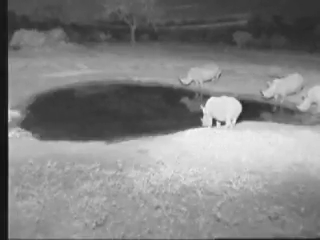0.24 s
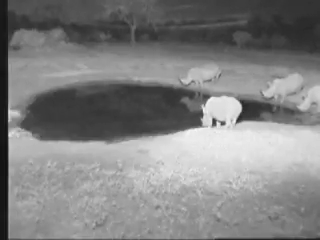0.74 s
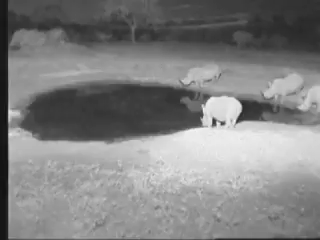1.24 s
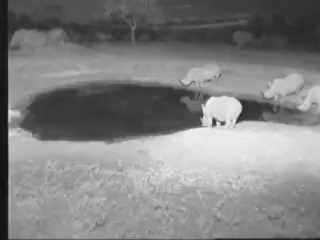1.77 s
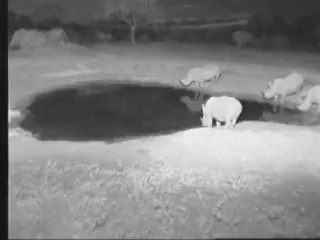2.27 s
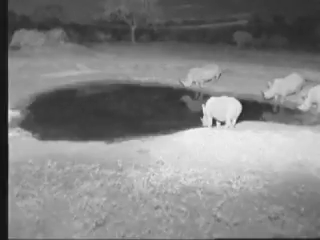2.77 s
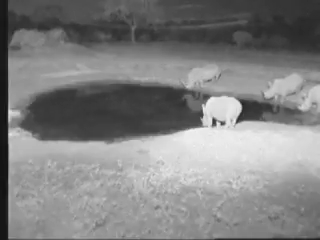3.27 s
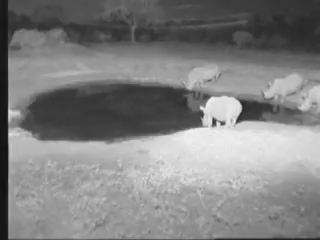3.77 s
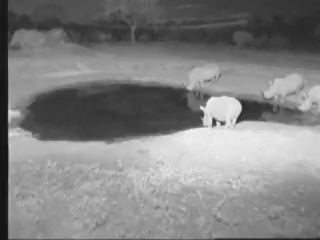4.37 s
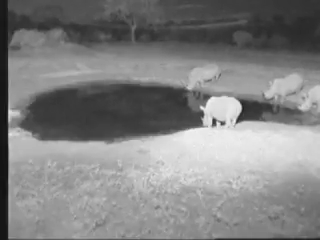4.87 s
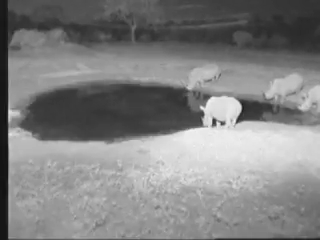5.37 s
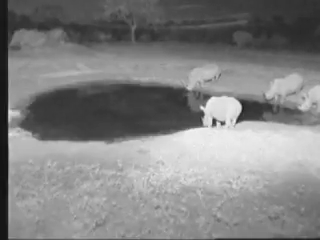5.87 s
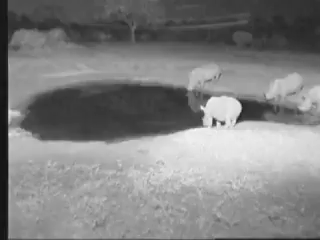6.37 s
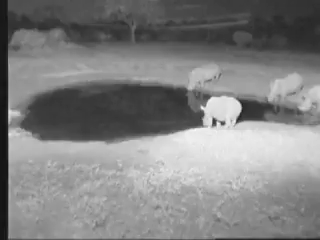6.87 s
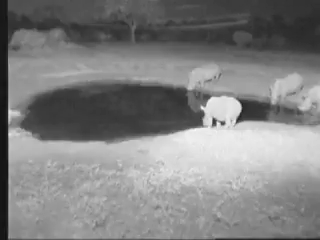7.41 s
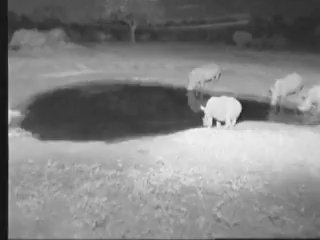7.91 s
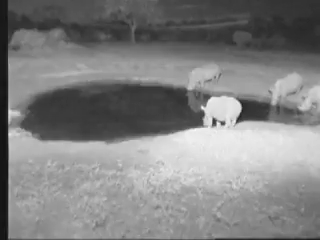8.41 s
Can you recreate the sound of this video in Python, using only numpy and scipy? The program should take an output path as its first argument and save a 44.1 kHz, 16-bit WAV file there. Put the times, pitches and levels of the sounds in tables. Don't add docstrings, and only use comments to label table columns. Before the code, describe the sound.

A rhino laps at a night waterhole with ringing drips, draws a hissing breath and blows one loud fluttering snort over steady electrical hum.

```python
import sys
import numpy as np
from scipy import signal
from scipy.fft import rfft, irfft, next_fast_len
from scipy.io import wavfile
from scipy.ndimage import uniform_filter1d, map_coordinates

SR = 44100
rng = np.random.default_rng(int(sys.argv[2]) if len(sys.argv) > 2 else 0)


def level_to_linear(level):
    exponent = np.asarray(level, float) / 20
    return 10 ** exponent


def store_wav(level_fs):
    pcm = np.round(np.clip(np.atleast_2d(level_fs), -1, 1) * 32767)
    wavfile.write(sys.argv[1], SR, pcm.T.astype(np.int16))


N = 381465
T = np.arange(N) / SR


def unit(x):
    return x / np.sqrt(np.mean(x ** 2) + 1e-20)


def curves(rows):
    time_s, *columns = np.transpose(rows)
    return [np.interp(T, time_s, column, left=-120, right=-120) for column in columns]


def wobble(rate_hz):
    knots = rng.standard_normal(int(N * rate_hz / SR) + 4)
    return map_coordinates(knots, [T * rate_hz])


def bump(start_s, length_s):
    return np.cos(np.pi * np.clip((T - start_s) / length_s, -.5, .5)) ** 2


def filtered(x, response):
    size = next_fast_len(N + SR // 2)
    return irfft(rfft(x, size) * response(np.fft.rfftfreq(size, 1 / SR)), size)[..., :N]


def colour(points):
    hz, db = np.transpose(points)
    return lambda f: level_to_linear(np.interp(np.log(f + 1), np.log(hz), db, left=-120, right=-120))


def modes(rows):
    def response(f):
        total = 0
        for k, (hz, width_hz, db) in enumerate(rows):
            damping = 1j * f * width_hz
            total = total + (-1) ** k * level_to_linear(db) * damping / (hz * hz - f * f + damping)
        return total
    return response


def rush(response, grain_db, patchy_db, count=6):
    grainy = rng.standard_normal(N) * level_to_linear(grain_db * wobble(300))
    z = signal.stft(grainy, nperseg=512)[2]
    patches = uniform_filter1d(rng.standard_normal(z.shape), size=4, axis=0)
    patches = uniform_filter1d(patches, size=count, axis=1)
    noise = signal.istft(z * level_to_linear(patchy_db * unit(patches)), nperseg=512)[1][:N]
    return unit(filtered(noise, response))


def hum():
    # (time [s], frequency [Hz])
    mains_hz = [(0, 49.878), (4, 49.870), (8.65, 49.852)]
    # (start [cycles], length [cycles], sign [+-1], level [dB])
    lobes = [
        (.0, .088, 1, -27),
        (.086, .15, -1, -21.5),
        (.22, .3, 1, -33),
    ]
    # (time [s], level [dB])
    load = [(0, -66), (1.3, -57), (2.1, -52.5), (4.2, -43.5), (5.4, -41.5), (7.7, -51), (8.65, -60)]
    cycle = np.cumsum(curves(mains_hz)[0]) / SR - .027
    wave = np.zeros(N)
    for start, length, sign, db in lobes:
        def lobe(phase):
            return np.sin(np.pi * np.clip(phase / length, 0, 1) ** .7) ** 1.2
        u = (cycle - start) % 1
        wave += sign * level_to_linear(db) * (lobe(u) - lobe((u - .5) % 1))
    load_db, = curves(load)
    for order, db in (7, -53), (9, -32 + .35 * load_db), (11, load_db):
        wave += level_to_linear(db + 3) * np.cos(2 * np.pi * order * (cycle - .065))
    return wave * level_to_linear(-0.85 + 0.36 * wobble(3))


def buzz():
    # (place [cycles], sign [+-1], level [dB])
    sync = [(.156, -1, -35), (.177, 1, -36), (.654, -1, -35), (.676, 1, -35), (.748, 1, -21),
            (.758, 1, -24), (.767, -1, -33), (.825, -1, -30)]
    field = T * 50 % 1
    sway = level_to_linear(-39) * np.sin(2 * np.pi * (field - .04))
    sway = sway + level_to_linear(-44) * np.sin(4 * np.pi * (field + .03))
    edges = sum(sign * level_to_linear(db) * np.exp(-((field - at) / 0.0031) ** 2) for at, sign, db in sync)
    whine = np.sin(2 * np.pi * 7084.7 * T) * (1 + .8 * np.cos(2 * np.pi * field))
    return sway + edges * level_to_linear(-1.2 + 1.2 * wobble(40)) + level_to_linear(-51.5 + 4.8 * wobble(5.5)) * whine


def noise_floor():
    # (frequency [Hz], density [dB per Hz])
    hiss_points = [(350, -16), (600, -3.5), (846, -2), (955, -7.5), (1700, -5.5), (2230, -6.5), (3250, -6),
                   (4100, -7), (6730, -5), (8750, -29.5), (14800, -120)]
    # (frequency [Hz], density [dB per Hz])
    murk_points = [(20, -4.5), (40, 4.5), (90, -10.5), (200, -9), (450, -13), (700, -17.5), (1100, -20.5),
                   (1500, -66)]
    hiss = rush(colour(hiss_points), grain_db=1.5, patchy_db=1.2)
    murk = rush(colour(murk_points), grain_db=-0.4, patchy_db=0.5)
    return level_to_linear(-38.5) * hiss + level_to_linear(-37) * murk


def grit(depth_db):
    # (frequency [Hz], density [dB per Hz])
    grit_points = [(7400, -40), (7700, 0), (11000, 0), (12400, 2), (12800, 1), (12900, -60)]
    z = signal.stft(rng.standard_normal(N), nperseg=8192)[2]
    lines = unit(uniform_filter1d(rng.standard_normal(z.shape), size=2, axis=1))
    noise = signal.istft(z * level_to_linear(depth_db * np.minimum(lines, 2)), nperseg=8192)[1][:N]
    return unit(filtered(noise, colour(grit_points)))


def laps():
    # (time [s], peak level [dB], length [s])
    flicks = [(0.0, -9, 0.026), (0.047, -9.5, 0.048), (0.321, -15, 0.03), (0.682, -15, 0.032),
              (0.7178, -18, 0.039), (0.755, -19, 0.06), (0.7861, -17.5, 0.049), (1.4097, -27, 0.035),
              (1.52, -24, 0.023), (2.601, -16.5, 0.035), (2.88, -18, 0.045), (3.835, -23, 0.043),
              (5.089, -20, 0.035), (5.167, -20.5, 0.028), (5.207, -34.5, 0.031)]
    # (time [s], peak level [dB], length [s])
    full_laps = [(0.022, -10, 0.025), (0.124, -14, 0.049), (0.1544, -17, 0.027), (0.492, -25.5, 0.043),
                 (0.6584, -8.5, 0.039), (1.3844, -18.5, 0.048), (1.9604, -14, 0.046), (1.9785, -8.5, 0.032),
                 (2.042, -10.5, 0.05), (2.548, -13.5, 0.051), (2.639, -18, 0.023), (3.1, -19, 0.05),
                 (3.16, -20, 0.044), (3.928, -20, 0.035)]
    # (time [s], peak level [dB], length [s])
    gulps = [(0.8707, -16.5, 0.043), (0.917, -25, 0.079), (1.545, -25, 0.068), (1.853, -17, 0.066),
             (1.888, -18.5, 0.071), (2.092, -24, 0.035), (2.4516, -16, 0.075), (2.481, -20, 0.059),
             (4.2155, -17, 0.03)]
    # (time [s], peak level [dB], length [s])
    sips = [(1.054, -26.5, 0.075), (1.2744, -19.5, 0.035), (1.309, -24, 0.04)]
    # (frequency [Hz], width [Hz], level [dB])
    water = [
        [(833, 420, 2), (1670, 530, 3)],
        [(2587, 530, 7), (3565, 620, 0)],
        [(5000, 620, 16.5), (6580, 640, -9.5)],
    ]
    # (rows, low share dB, high share dB)
    strokes = [(flicks, -6, -10.5), (full_laps, -7, -21), (gulps, 0, -22), (sips, -22, -18)]
    powers, t = np.zeros((3, N + SR)), np.arange(SR // 2) / SR
    for rows, low_db, high_db in strokes:
        shares = level_to_linear(np.array([low_db, 0, high_db]))
        for start_s, db, length_s in rows:
            decay = np.exp(-(t / length_s) ** 2) + .15 * np.exp(-t / 0.1)
            shape = level_to_linear(db - 9) * decay * (1 - np.exp(-t / 0.0071))
            powers[:, round(start_s * SR):][:, :len(t)] += np.outer(shares, shape) ** 2
    return sum(np.sqrt(power[:N]) * rush(modes(band), grain_db=2.5, patchy_db=2.8)
               for power, band in zip(powers, water))


def trickles():
    # (time [s], length [s], frequency [Hz], width [Hz], level [dB])
    runs = [(.02, 0.065, 4970, 500, -28), (0.138, 0.053, 5000, 600, -27), (0.323, 0.037, 6700, 600, -32),
            (0.659, 0.043, 5170, 500, -30.5), (1.532, 0.16, 2700, 400, -37), (1.96, 0.065, 6800, 400, -38),
            (1.963, 0.081, 5240, 500, -34.5), (2.284, 0.084, 2670, 400, -35), (2.58, .06, 4700, 400, -37),
            (2.675, 0.08, 1950, 120, -37), (5.799, 0.22, 1300, 700, -43.5), (7.754, .1, 1860, 400, -37),
            (7.72, .08, 5300, 120, -42), (7.93, .08, 5400, 100, -40), (8.062, 0.1, 2700, 500, -42.5),
            (8.297, 0.24, 2650, 90, -42)]
    out = np.zeros(N)
    for start_s, length_s, hz, width_hz, db in runs:
        u = np.arange(round(length_s * SR)) / (length_s * SR)
        band = signal.iirpeak(hz, hz / width_hz, SR)
        noise = unit(signal.lfilter(*band, rng.standard_normal(SR // 4)))
        out[round(start_s * SR):][:len(u)] += level_to_linear(db) * np.sqrt(np.sin(np.pi * u ** 0.51)) * noise[:len(u)]
    return out


def drops():
    # (time [s], peak level [dB], pitch [Hz], rise [share])
    plinks = [(0.029, -4, 3140, 0.32), (.049, -16, 2600, 0.23), (.1315, -11, 3020, 0.25),
              (.685, -11, 2510, 0.61), (1.2365, -12, 6500, -0.089), (1.682, -2.5, 2650, 0.15),
              (1.682, -18, 5000, 0.01), (1.689, -13, 2710, -0.22), (1.996, -9, 2900, .2),
              (4.878, -8, 5000, 0.01), (5.0235, -4.5, 3100, 0.01), (2.669, -21, 2100, -.1),
              (3.94, -22, 1600, .05)]
    # (time [s], peak level [dB], pitch [Hz], ring T60 [s])
    splashes = [(3.087, -12, 2400, .02), (3.092, -5.5, 2950, 0.024), (3.095, -10.5, 2200, 0.019),
                (3.092, -14, 1380, 0.018), (3.098, -10.5, 820, 0.022), (3.094, -16, 1140, .02),
                (3.339, -17, 1244, .08), (5.4075, -20, 3800, .004), (5.4075, -22, 1100, .008),
                (5.4268, 9, 3020, .015), (5.436, -9, 3000, .06), (5.4244, -15, 2410, .02),
                (5.427, -3, 3600, 0.015), (5.427, -6, 4600, .006), (5.427, -9, 6000, .005),
                (5.427, -10, 800, 0.027), (5.442, -11, 1400, 0.036), (5.427, 3, 2000, 0.013),
                (5.4339, 4.5, 1330, 0.01), (6.502, -22, 1010, 0.037), (6.5105, -11, 1300, 0.035),
                (6.512, -5, 1046, 0.023), (6.51, -19.5, 2620, .04), (6.512, -25, 3400, .02),
                (7.553, -12, 1200, 0.015), (7.558, -21.5, 2690, 0.06), (7.560, -17.5, 3450, 0.037),
                (7.5625, -7, 5450, 0.018), (7.567, -19, 5200, .035), (7.564, -22, 6800, .02)]
    # (time [s], peak level [dB], pitch [Hz], rise [share], ring T60 [s])
    gurgle = (2.547, -21.5, 1400, 1.55, 0.72)
    plink_t60_s, splash_rise = .015, .04
    bubbles = [row + (plink_t60_s,) for row in plinks]
    bubbles += [(start_s, db, hz, splash_rise, t60_s) for start_s, db, hz, t60_s in splashes]
    bubbles += [gurgle]
    spray_full_scale_db, spray_growth, spray_db_per_octave = -21, .75, 1.5
    out, t = np.zeros(N + SR), np.arange(SR // 4) / SR
    echo = level_to_linear(-60 * t / 0.15) + level_to_linear(-17.5) * np.exp(-((t - .042) / 0.013) ** 2)
    for start_s, db, hz, rise, t60_s in bubbles:
        pitch_hz = hz * (1 + rise * np.clip(t / 0.032, 0, 1) ** 3)
        ring_db = -60 * t / t60_s + 2.1 * rise * np.sin(2 * np.pi * t / 0.035 + 1.4)
        ring = np.sin(2 * np.pi * np.cumsum(pitch_hz) / SR) * level_to_linear(ring_db)
        ring *= t < .038 + (rise < 1)
        band = signal.iirpeak(hz * (1 + rise / 2), 3.5, SR)
        white = rng.standard_normal(len(t))
        scatter = signal.lfilter(*band, signal.lfilter(*band, white)) + 0.08 * white
        spray_db = spray_full_scale_db + (spray_growth - 1) * db + spray_db_per_octave * np.log2(hz / 2500)
        spray = level_to_linear(spray_db) * echo * unit(scatter)
        attack = 1 - np.exp(-t * hz / 1.3)
        out[round(start_s * SR) - 40:][:len(t)] += level_to_linear(db + 2) * attack * (ring + spray)
    return out[:N]


def supply():
    bursts = [(2, 2, 3), (11, 3, 2), (16, 2, 2), (22, 2, 2), (27, 2, 2), (32, 2, 4), (41, 2, 2), (46, 4, 2),
              (53, 3, 3), (61, 2, 2), (66, 2, 2), (72, 3, 2), (79, 2, 2), (86, 3, 2), (93, 7, 3),
              (104, 9, 2), (115, 3, 2), (122, 3, 3), (130, 2, 4), (139, 4, 3), (154, 3, 4), (168, 2, 3),
              (175, 10, 2), (188, 5, 2), (196, 2, 3), (204, 3, 2), (209, 2, 3)]
    # (time [s], length [s], level [dB])
    sag_rows = [(2.07, .08, -34), (4.413, 0.11, -30), (4.78, .08, -40), (5.978, .14, -28), (7.08, .12, -23),
                (8.588, 0.058, -30)]
    frame_s, clock_start_s, thump_db, thump_s = .04, .028, -21.5, .04
    sent_s = [clock_start_s + frame_s * (first + apart * k)
              for first, apart, count in bursts for k in range(count)]
    jumps = sum(level_to_linear(thump_db + .8 * rng.normal()) * bump(start_s, thump_s) for start_s in sent_s)
    sags = sum(level_to_linear(db) * bump(start_s, length_s) for start_s, length_s, db in sag_rows)
    return jumps - sags + level_to_linear(-39) * wobble(10)


def inhale():
    # (time [s], level [dB])
    flow = [
        (2.8, -45),
        (2.918, -38),
        (3.056, -33),
        (3.294, -37),
        (3.46, -37.5),
        (3.836, -33.5),
        (4.22, -39.5),
    ]
    # (frequency [Hz], width [Hz], level [dB])
    nostril = [
        [(2900, 830, 8), (3850, 500, 4.5)],
        [(5740, 600, 7.5), (4470, 250, 3)],
    ]
    flow_db, = curves(flow)
    whistle_db = flow_db + -8 + 4.5 * (T - flow[0][0])
    return sum(level_to_linear(db + 1.5 + wobble(14)) * rush(modes(band), grain_db=1.5, patchy_db=1.8)
               for db, band in zip((flow_db, whistle_db), nostril))


def snort():
    # (time [s], effort [dB], nasal share [dB])
    blast = [
        (4.214, -55, -5),
        (4.219, -27, -6),
        (4.262, -19, -.5),
        (4.3, -11, -3),
        (4.41, -12.5, -.5),
        (4.548, -6.3, -1.5),
        (4.8, -15.5, -2),
        (5.03, -25, -6.5),
        (5.3, -55, 5),
    ]
    # (frequency [Hz], density [dB per Hz])
    blow_points = [(88, -47.5), (150, -19.5), (173, -41.5), (250, -5), (275, -29), (343, 1), (464, -2.5),
                   (511, 3.5), (773, 1.5), (906, -4.5), (1850, -13), (2590, -9.5), (4180, -7.5),
                   (6020, -5.5), (6730, -10), (8750, -24.5), (14800, -120)]
    chest_hz, chest_db, chest_lag_s = 430, -7.5, .1
    spray_swing = 1.05
    blow = colour(blow_points)

    def over(f, hz):
        return 1 / (1 + (hz / (f + 1)) ** 6)

    parts = [lambda f: blow(f) * (1 - over(f, chest_hz)),
             lambda f: blow(f) * over(f, chest_hz) * (1 - over(f, 900)),
             lambda f: blow(f) * over(f, 996) * (1 - over(f, 3830)),
             lambda f: blow(f) * over(f, 3900) * (f < 7000)]
    effort_db, nasal_db = curves(blast)
    nose_db = effort_db + nasal_db
    late_db = np.interp(T - chest_lag_s, T, nose_db)
    levels_db = np.minimum(nose_db, late_db) + chest_db, nose_db - 1.2, effort_db, spray_swing * effort_db
    depths_db = 1.3, 1.3, .8, .7
    flutter = wobble(45)
    return sum(level_to_linear(db + 1.5 + depth_db * flutter) * rush(part, grain_db=1.8, patchy_db=1.5, count=14)
               for db, part, depth_db in zip(levels_db, parts, depths_db))


def scene():
    air = laps() + trickles() + drops() + inhale() + snort()
    line = noise_floor() + hum() + buzz() + supply()
    return np.tile(air + line, (2, 1))


def band_limit(x):
    return signal.sosfilt(signal.butter(12, 15800, fs=SR, output="sos"), x)


def record(dry):
    link_hz = 7150
    x = dry / (1 + abs(dry / 1.3) ** 4) ** (1 / 4)
    x = filtered(x, lambda hz: 1 / (1 + (hz / link_hz) ** 120))
    loud = np.sqrt(abs(uniform_filter1d(np.diff(x[0], prepend=0) ** 2, size=3000)))
    x = x + level_to_linear(-58) * grit(6.5) / (1 + (loud / level_to_linear(-27)) ** 4)
    surge_db, surge_from_db = -29.5, -2.6
    held = np.sqrt(abs(uniform_filter1d(loud ** 2, size=6000)))
    thin_tones = unit(filtered(grit(16), lambda hz: 1 / (1 + (hz / 10800) ** 10)))
    x = x + level_to_linear(surge_db) * thin_tones / (1 + (level_to_linear(surge_from_db) * held.max() / (held + 1e-9)) ** 14)
    x = x + np.array([[-.132], [-.161]])
    x = x + level_to_linear(-54.5) * np.outer([1, -1], wobble(70))
    return band_limit(np.clip(x, -.99, .99))


dry = scene()
out = record(dry)
store_wav(out)
```